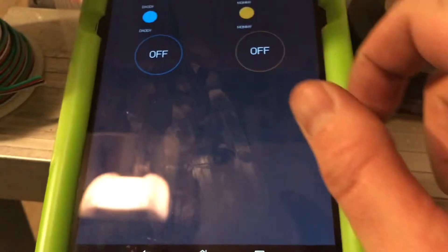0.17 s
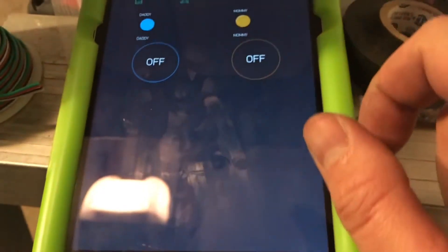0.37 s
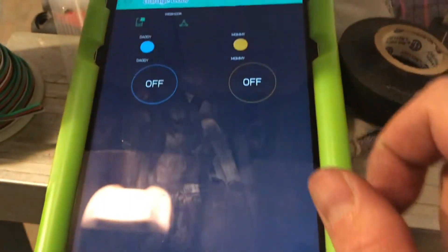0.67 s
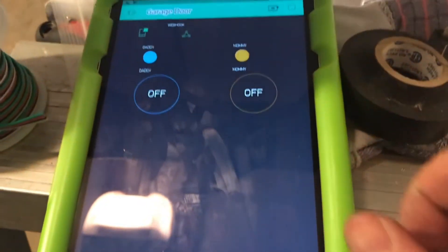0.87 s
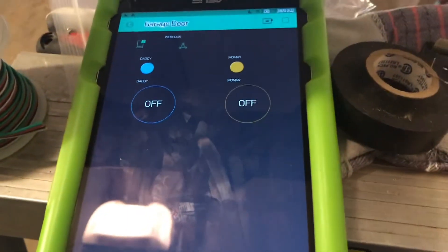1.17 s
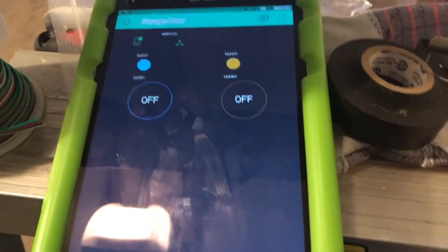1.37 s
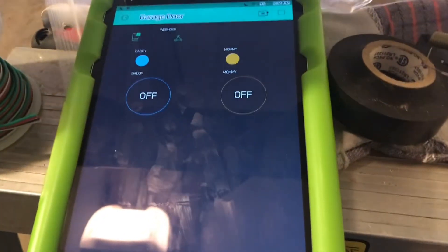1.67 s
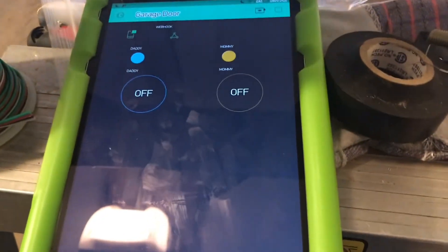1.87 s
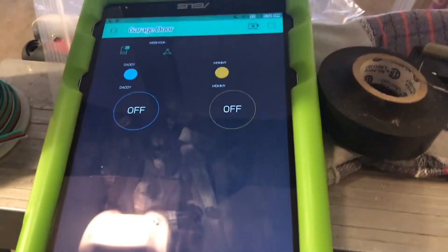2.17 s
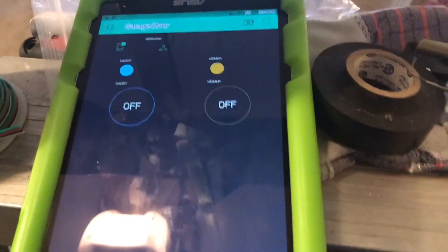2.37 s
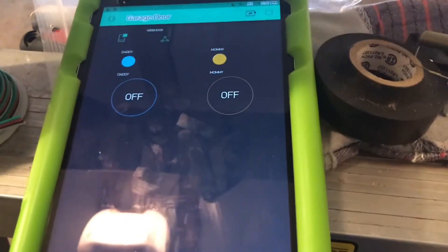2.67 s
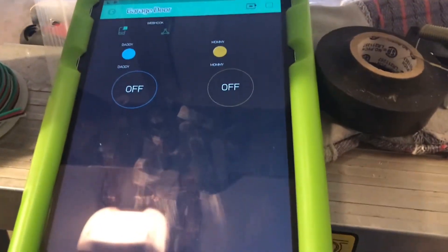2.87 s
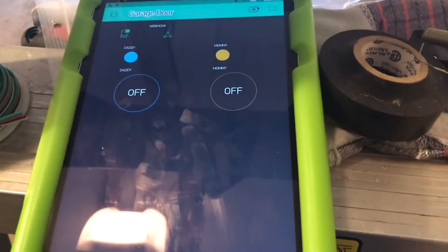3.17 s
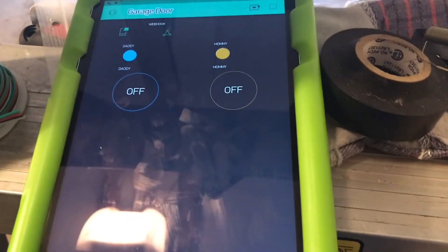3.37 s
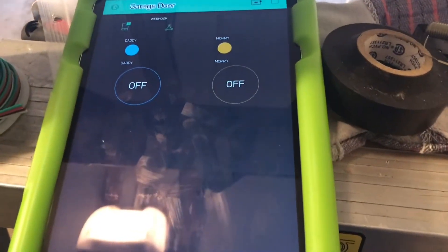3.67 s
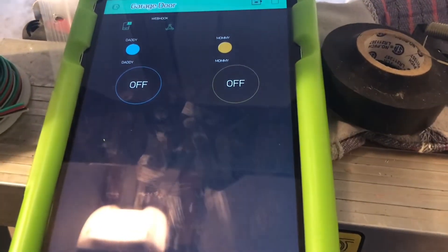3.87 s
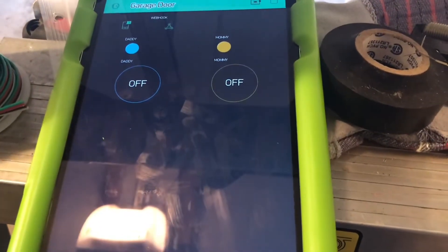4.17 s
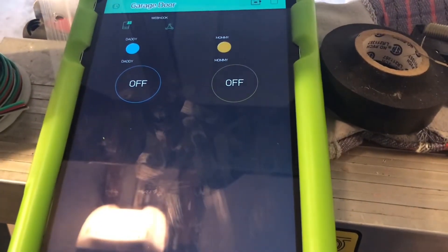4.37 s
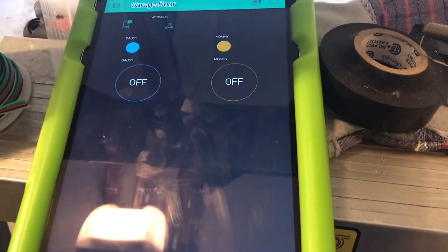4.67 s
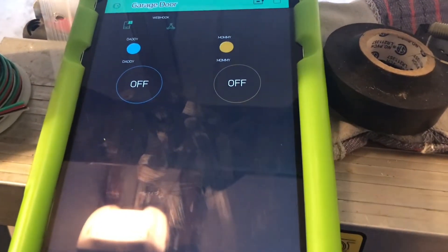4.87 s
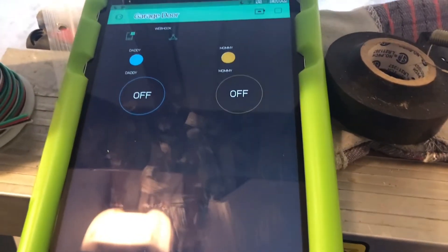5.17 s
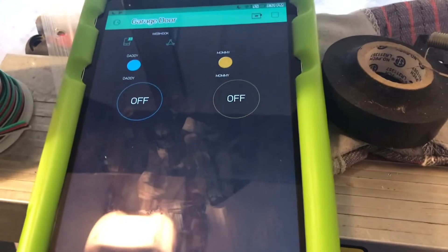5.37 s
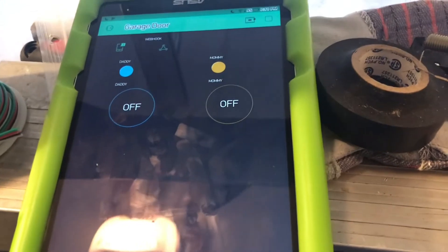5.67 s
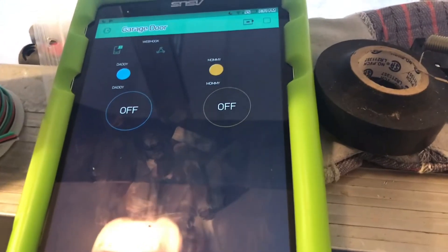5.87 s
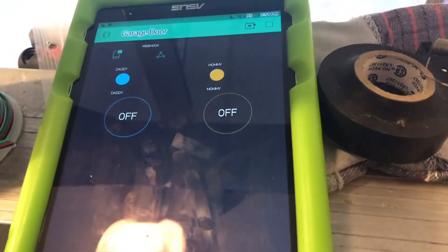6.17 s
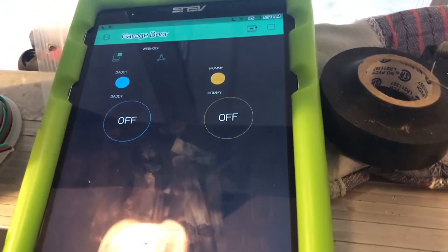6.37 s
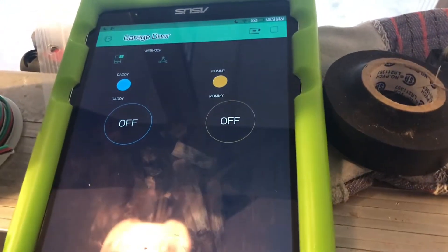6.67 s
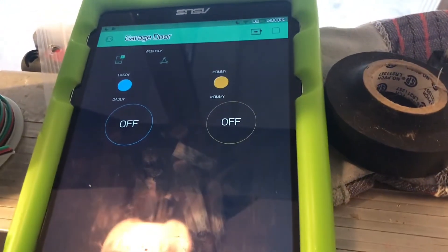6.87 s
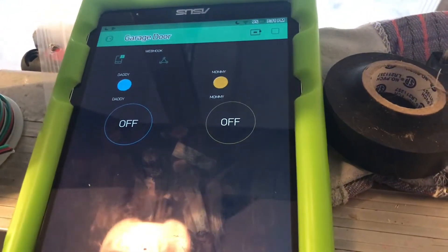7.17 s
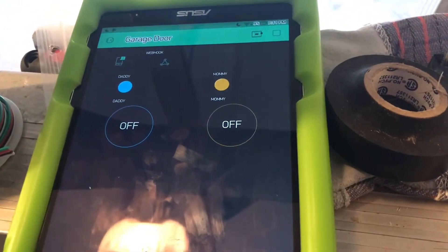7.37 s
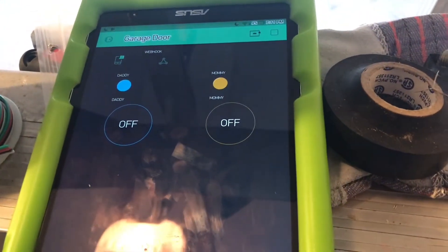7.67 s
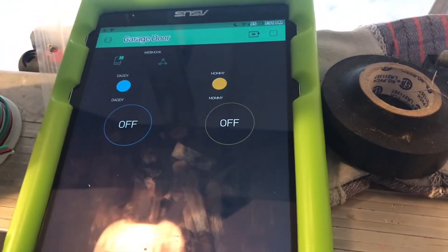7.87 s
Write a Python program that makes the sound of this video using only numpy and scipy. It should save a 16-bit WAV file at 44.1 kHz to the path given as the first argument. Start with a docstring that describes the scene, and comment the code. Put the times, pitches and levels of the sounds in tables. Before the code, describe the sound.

A garage door opener runs throughout with a deep, slightly throbbing electric hum. The moving door panels rumble under it, rollers grind softly in steel tracks, and the chain rustles and ticks in short runs. A light metal clank comes about three seconds in and a louder one near the end, with a few faint squeaks. It is heard from a workbench inside the garage.

```python
"""Garage door opening

A chain-drive opener lifts its door, heard from a workbench in the garage. The induction motor hums
at twice the mains frequency and throbs as the drive sways; its shaft shakes the housing and the
door panels rumble. Rollers run in their steel tracks with an odd clank or squeak, and the chain
rustles and ticks over the sprocket."""
import sys
import numpy as np
from scipy import signal
from scipy.fft import rfft, irfft
from scipy.io import wavfile

SR = 44100
rng = np.random.default_rng(int(sys.argv[2]) if len(sys.argv) > 2 else 0)


def to_wav(s):
    """Save 16-bit WAV."""
    ch = np.atleast_2d(s).T  # columns
    pcm = np.round(np.clip(ch, -1, 1) * 32767)  # PCM
    wavfile.write(sys.argv[1], SR, pcm.astype(np.int16))


N = 353241
TIME = np.arange(N) / SR
MAINS_HZ, SHAFT_HZ = 59.98, 29.19

# Faders for the running noise. Each row: time in seconds, then rollers, rail and chain in relative dB.
RUNNING_LEVELS = [(0, -41, -42.5, -49), (0.18, -48.5, -47.5, -53.5), (0.33, -44, -44.5, -52),
                  (0.9, -45.5, -46, -54), (1.2, -50, -48, -53), (1.38, -48, -46, -52),
                  (1.6, -47, -47, -54.5), (2.45, -48, -47, -53), (3, -44.5, -46.5, -52.5),
                  (3.7, -47.5, -49, -54.5), (4.6, -48.5, -49.5, -56), (5.7, -48.5, -50.5, -55.5),
                  (6.8, -48, -48, -55), (7.25, -47, -47.5, -55), (7.85, -45, -46.5, -53),
                  (8.01, -46.5, -41.5, -48)]


def motor(running_db=-24, start_dip_db=-3, rise_s=0.35, throb_db=0.57, flutter=0.25, waver=0.45):
    """Magnetic hum, locked to the mains, builds up and throbs; the shaft slips behind it and wavers."""
    # Colour of the hum. Each row: multiple of the mains frequency, level in dB against the hum.
    hum_partials = [(1, -37), (4, -22.5), (6, -28), (20, -42.5)]
    # Unbalance and gear mesh. Each row: multiple of the shaft speed, level in dB.
    shaft_partials = [(1, -64.5), (2, -54.5), (5, -50.5), (7, -54.5), (9, -47.5), (15, -59.5), (17, -61.5),
                      (18, -66.5), (19, -67), (24, -69)]
    # Thin, steady whines of the drive. Each row: pitch in Hz, level in dB.
    whines = [(91, -52), (332, -56.5), (383, -62), (404, -63.5), (655, -64), (687, -65), (720, -71),
              (844, -65), (958, -66), (4615, -71)]
    mains_phase = 2 * np.pi * MAINS_HZ * TIME
    buzz = sum(gain_of(db) * np.sin(round(k) * mains_phase + rng.uniform(0, 2 * np.pi))
               for k, db in hum_partials)
    hum_db = running_db + start_dip_db * np.exp(-TIME / rise_s) + throb_db * sway() + 0.28 * wander(12)
    hum = gain_of(hum_db) * (np.sin(2 * mains_phase) + buzz * (1 + flutter * wander(8.9)))
    shaft_phase = phase_of(SHAFT_HZ + 0.055 * wander(1.77))
    shake = whine = 0
    for k, db in shaft_partials:
        gain = gain_of(db) * (1 + waver * wander(4.5))
        shake += gain * np.sin(round(k) * shaft_phase + rng.uniform(0, 2 * np.pi))
    for hz, db in whines:
        gain = gain_of(db) * (1 + waver * wander(4.5))
        whine += gain * np.sin(phase_of(hz + 0.774 * wander(5.2)))
    return np.sqrt(2) * (hum + shake + whine)


def housing(shaft_order=7, offset_hz=1, drift_hz=3, sharpness=1.5):
    """The sheet-metal housing picks up one shaft order and drones in a swell just after each sway."""
    # Crest of the swells. Each row: time in seconds, level in dB.
    crests = [(0, -48), (0.7, -39.5), (1.75, -35), (2.2, -43), (3.55, -42.5), (4.2, -61), (5.9, -51),
              (6.4, -38.5), (7.35, -42), (8.01, -44)]
    swells = fader(crests) * ((1 + sway(lag=0.24)) / 2) ** sharpness
    hz = shaft_order * SHAFT_HZ + offset_hz + drift_hz * wander(4.68)
    return np.sqrt(2) * swells * np.sin(phase_of(hz))


def door_rumble(panel_sway_db=0.55, ceiling_sway_db=1.3):
    """The door panels and the ceiling that carries the drive boom in time with the sway."""
    # Boom of the panels and the room. Each row: frequency in Hz, spectral level in dB.
    panel_eq = [(100, -25), (135, -7.5), (155, -6.5), (172, -2.5), (187, -10.5), (210, 1), (226, -3),
                (252, -3), (285, -3), (310, -6), (355, -1), (372, -10), (450, -17), (650, -28.5)]
    # Deep boom of the ceiling. Each row: frequency in Hz, spectral level in dB.
    ceiling_eq = [(22, -41), (42, -24), (57, -1), (68, -1), (82, -10), (100, -2), (140, -11)]
    # Rumble of the moving door. Each row: time in seconds, panels in dB, ceiling in dB.
    rumble_levels = [(0, -37, -46), (0.35, -36.5, -41), (0.8, -36.5, -40), (1.5, -38.5, -46),
                     (2.3, -39, -49), (2.75, -38.5, -45), (4, -42, -54), (4.6, -41.5, -60), (5, -40, -48),
                     (5.4, -41, -51), (6.8, -38, -42.5), (7.45, -41, -49), (8.01, -36, -42)]
    panels = fader(rumble_levels) * evened(colour(rng.standard_normal(N), panel_eq))
    ceiling = fader(rumble_levels, column=2) * evened(colour(rng.standard_normal(N), ceiling_eq))
    return panels * gain_of(panel_sway_db * sway(lag=0.37)) + ceiling * gain_of(ceiling_sway_db * sway())


def rollers_and_rail(song_hz=2010, song_width_hz=130):
    """Rollers grind along the track and the carriage slides on its singing rail, with uneven drag."""
    # Rollers in the steel track. Each row: frequency in Hz, spectral level in dB.
    track_eq = [(200, -39), (420, -1), (600, -2), (800, -3), (1100, -2.5), (1240, -2), (1500, -3),
                (1850, -8), (2600, -25), (6000, -30)]
    # The carriage on its rail. Each row: frequency in Hz, spectral level in dB.
    rail_eq = [(1200, -26), (1900, -5.5), (2100, 1), (2550, -1.5), (3050, -3.5), (3200, -3.5), (3550, -7),
               (3850, -7), (4600, -8), (4900, -13), (5300, -9.5), (5800, -13), (9000, -28)]
    # The rail sings under the pull of the chain. Each row: time in seconds, level in dB.
    song_levels = [(0, -51.5), (.75, -60), (1.25, -53.5), (1.7, -59), (2.1, -61), (2.43, -49.5), (2.7, -53),
                   (2.95, -52), (3.6, -59), (4.3, -61), (5.8, -64), (6.6, -61), (7.4, -59), (7.8, -59),
                   (8, -48)]
    drag = wander(6)
    grind = rattle(track_eq, knocks_per_s=400, knock_share=0.36, flicker_db=-0.07)
    slide = rattle(rail_eq, knocks_per_s=900, knock_share=0.32, flicker_db=0.5)
    rollers = gain_of(1 + 1.06 * drag) * fader(RUNNING_LEVELS) * grind
    carriage = gain_of(-0.5 + 0.84 * drag) * fader(RUNNING_LEVELS, column=2) * slide
    song = fader(song_levels) * ring(rng.standard_normal(N), song_hz, song_width_hz)
    return rollers + carriage + song


def sprocket(hard_trim_db=-9, soft_db=-47.5, spread_db=0.8, tilt_spread_db=2, split_hz=9800, room_db=-10):
    """A link meets the sprocket every second motor turn: hard in runs that swell or fade, else softly."""
    # Runs of links that seat hard. Each row: start in seconds, length in seconds,
    # first and last peak in relative dB, brightness in dB.
    hard_runs = [(0.0423, 0.03, -28, -28, 0), (0.163, 0.3, -31, -35, -7), (0.575, 0.17, -33, -23, 5),
                 (1.055, 0.17, -25, -29, -2), (1.26, 0.1, -21.5, -29.5, -3), (1.3946, 0.17, -30, -34, -5),
                 (1.873, 0.03, -28.5, -29, -2), (2.356, 0.31, -29.5, -31.5, -4),
                 (2.7691, 0.24, -35, -19, 7), (3.146, 0.03, -31, -29.5, 7), (3.386, 0.17, -34, -30, 0),
                 (3.796, 0.24, -30, -29, 2), (4.276, 0.17, -32, -30, -4), (4.693, 0.24, -32.5, -32, 0),
                 (5.582, 0.03, -28, -28.5, 4), (5.7139, 0.31, -33, -32, -5), (6.127, 0.03, -28, -27.5, -5),
                 (6.199, 0.41, -31, -31, 1), (6.679, 0.24, -28, -26, -3.5), (7.298, 0.16, -27.5, -37, 4),
                 (7.5095, 0.1, -26.5, -33, 8), (7.649, 0.38, -25.5, -34, 7)]
    link_s, ticks = 2 / SHAFT_HZ, []
    next_starts = [run[0] for run in hard_runs[1:]] + [N / SR + link_s / 2]
    for (start, length, first_db, last_db, bright_db), end in zip(hard_runs, next_starts):
        for age in np.arange(0, end - start - link_s / 2, link_s):
            run_db = hard_trim_db + np.interp(age, [0, length], [first_db, last_db])
            ticks.append((start + age, run_db, bright_db) if age < length else (start + age, soft_db, 0))
    scatter = rng.standard_normal((len(ticks), 3)) * [0, spread_db, tilt_spread_db]
    lowpass = signal.butter(4, split_hz, fs=SR, output="sos")
    blows = np.zeros(N)
    for start, db, tilt_db in ticks + scatter:
        tick = link_tick()
        dull = signal.sosfiltfilt(lowpass, tick)
        # a sharper blow moves the ring from the link's low modes to its high ones
        tilted = dull * gain_of(-tilt_db / 2) + (tick - dull) * gain_of(tilt_db / 2)
        add(blows, start - 0.0095, gain_of(db) * tilted)
    # Ring of one link. Each row: frequency in Hz, spectral level in dB.
    link_eq = [(1500, -26), (4000, -6.5), (5300, -8), (6150, 2.5), (6900, 2.5), (7600, -4.5), (8600, 0.5),
               (10200, -7.5), (11100, -2), (12800, -12.5), (14500, -13), (16000, -19)]
    ticking = colour(blows, link_eq)
    return ticking + gain_of(room_db) * garage(ticking, t60=0.39)


def link_tick(rise_s=0.00034, hold_s=0.00036, decay_s=0.0032, graze=0.27, max_lead_s=0.0067):
    """A link grazes the tooth, then seats 10 ms in with a short metallic chatter."""
    t = TIME[:SR // 25] - 0.01
    blow = lambda age: np.exp(np.minimum(age / rise_s, -np.maximum(age - hold_s, 0) / decay_s))
    chatter = rng.choice([-1, 1], len(t))
    return (blow(t) + graze * rng.random() * blow(t + max_lead_s * rng.random())) * chatter


def chain(rustle_trim_db=1, shiver_s=0.13):
    """The moving chain rustles, and the rail shivers for a moment after the hardest ticks."""
    # Rustle of the links. Each row: frequency in Hz, spectral level in dB.
    rustle_eq = [(3000, -31), (5100, -7), (5350, -5.5), (5950, -5), (6350, 0), (6850, -1.5), (7300, -4.5),
                 (8700, -6), (9500, -9), (9850, -5), (10400, -14.5), (11100, -11.5), (12500, -13),
                 (16000, -18.5)]
    # Hardest ticks, which shake the rail. Each row: start in seconds, level in dB.
    jolts = [(.044, -52), (1.262, -53), (2.978, -48.5)]
    # Ring of the rail when a hard tick shakes it. Each row: frequency in Hz, spectral level in dB.
    rail_ring_eq = [(1500, -15), (2700, -3), (4200, 17), (6500, 3), (9000, 4), (12000, -8), (16000, -19)]
    rustle = rattle(rustle_eq, knocks_per_s=820, knock_share=0.52, flicker_db=1.5)
    rustle *= gain_of(rustle_trim_db) * fader(RUNNING_LEVELS, column=3)
    shivers = np.zeros(N)
    for start, db in jolts:
        add(shivers, start, gain_of(db) * np.exp(-TIME[:SR // 2] / shiver_s))
    return rustle + colour(shivers * rng.standard_normal(N), rail_ring_eq)


def clanks_and_squeaks(attack_s=0.00096, decay_s=0.032, room_db=-5):
    """Door sections knock in the track and dry rollers scrape and squeak."""
    # Knocks of the sections. Each row: start in seconds, level in dB.
    clanks = [(2.951, -40.5), (5.03, -47), (6.576, -34.5), (6.61, -44), (6.638, -47)]
    # Ring of a section. Each row: frequency in Hz, width in Hz, relative level in dB.
    section_modes = [(1400, 260, 2), (2390, 520, 0.5), (4540, 460, -7), (5250, 810, -7.5)]
    # Roller squeaks. Each row: start and length in seconds, pitch and width in Hz, level in dB.
    squeaks = [(0.243, 0.18, 2300, 400, -51), (0.362, 0.11, 1570, 400, -47), (.47, 0.045, 5080, 800, -48),
               (.93, 0.19, 2440, 500, -52), (4.978, 0.17, 1450, 300, -47), (5.326, 0.12, 1250, 1100, -46),
               (5.547, 0.1, 1450, 300, -53), (5.77, 0.11, 1400, 300, -46), (5.982, 0.11, 1390, 300, -49),
               (6.6, 0.62, 4400, 450, -57), (6.732, 0.17, 1400, 300, -51.5), (7.681, 0.22, 1390, 400, -50)]
    mix, t = np.zeros(N), TIME[:SR // 3]
    strike = (1 - np.exp(-t / attack_s)) * np.exp(-t / decay_s)
    for start, db in clanks:
        chatter = rng.standard_normal(len(t))
        body = sum(gain_of(mode_db) * ring(chatter, hz, width) for hz, width, mode_db in section_modes)
        add(mix, start, gain_of(db) * strike * evened(body))
    for start, length, hz, width, db in squeaks:
        swell = np.hanning(round(length * SR))
        squeak = ring(rng.standard_normal(SR), hz, width)[:len(swell)]
        add(mix, start, gain_of(db) * swell * squeak)
    return mix + gain_of(room_db) * garage(mix, t60=0.69)


def sway(lag=0, first_crest_s=0.102):
    """The drive sways on its hangers as it pulls: -1 to 1, lagging by a share of one cycle."""
    # Pace of the sway. Each row: time in seconds, sways per second.
    pace = [(0, 3.24), (3.6, 3.29), (4.3, 3.57), (5.5, 3.45), (5.9, 2.63), (6.6, 4.15), (8, 3.28)]
    cycles = np.cumsum(np.interp(TIME, *np.transpose(pace))) / SR
    return np.cos(2 * np.pi * (cycles - np.interp(first_crest_s, TIME, cycles) - lag))


def rattle(eq, knocks_per_s, knock_share, flicker_db):
    """Smooth rubbing mixed with many tiny ringing knocks, heard through the part that they shake."""
    hits = (rng.random(N) < knocks_per_s / SR) * rng.standard_normal(N)
    rub = rng.standard_normal(N)
    knocks = evened(garage(hits, t60=0.069))
    friction = np.sqrt(knock_share) * knocks + np.sqrt(1 - knock_share) * rub
    return evened(colour(friction * gain_of(flicker_db * wander(52)), eq))


def garage(x, t60, echoes_per_s=3000, predelay_s=0.004):
    """Echoes of the garage: sparse taps of random sign that fall 60 dB in t60 seconds."""
    t = TIME[:SR // 2]
    taps = rng.choice([-1, 1], len(t)) * (rng.random(len(t)) < echoes_per_s / SR) * (t > predelay_s)
    tail = taps * np.exp(-np.log(1000) * t / t60)
    return signal.fftconvolve(x, tail / np.linalg.norm(tail))[:N]


def ring(x, hz, width):
    """A steep resonance at an rms of 1: two like stages in a row."""
    b, a = signal.iirpeak(hz, hz / width, SR)
    return evened(signal.lfilter(b, a, signal.lfilter(b, a, x)))


def colour(x, eq):
    """Applies an EQ curve; white noise keeps its power."""
    eq_hz, eq_db = np.transpose(eq)
    hz = np.fft.rfftfreq(N, 1 / SR)
    shape = gain_of(np.interp(np.log(hz + 1), np.log(eq_hz), eq_db, left=-90, right=-90))
    return irfft(rfft(x) * evened(shape), N)


def wander(rate_hz):
    """Smooth random drift at an rms of 1, up to about the given rate."""
    hz = np.fft.rfftfreq(N, 1 / SR)
    return evened(irfft(rfft(rng.standard_normal(N)) * np.exp(-(hz / rate_hz) ** 2), N))


def fader(rows, column=1):
    """One dB column of a level curve, as a gain for every sample."""
    columns = np.transpose(rows)
    return gain_of(np.interp(TIME, columns[0], columns[column]))


def add(mix, start_s, sound):
    """Mixes a sound in at its start time."""
    part = mix[max(round(start_s * SR), 0):][:len(sound)]
    part += sound[:len(part)]


def phase_of(hz):
    """Running phase of a moving pitch, in radians."""
    return 2 * np.pi * np.cumsum(hz) / SR


def gain_of(db):
    """Decibels to gain."""
    return 10 ** (np.asarray(db) / 20)


def evened(x):
    """Scales to an rms of 1."""
    return x / np.sqrt(np.mean(x ** 2) + 1e-20)


def scene():
    """Motor, door and chain together, in mono."""
    drive = motor() + housing()
    door = door_rumble() + rollers_and_rail()
    return (drive + door + sprocket() + chain() + clanks_and_squeaks())[None]


def record(dry):
    """A steep high cut takes the top air off the mix."""
    high_cut = signal.firwin(511, 15850, window=("kaiser", 9), fs=SR)
    return signal.oaconvolve(dry, high_cut[None], "same")


dry = scene()
out = record(dry)
to_wav(out)
```